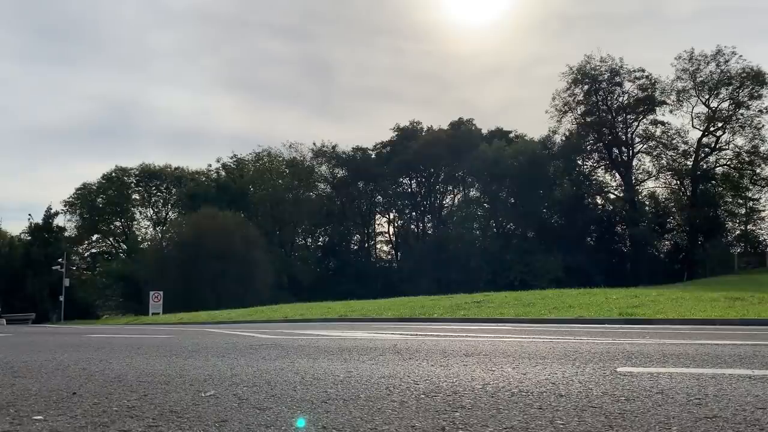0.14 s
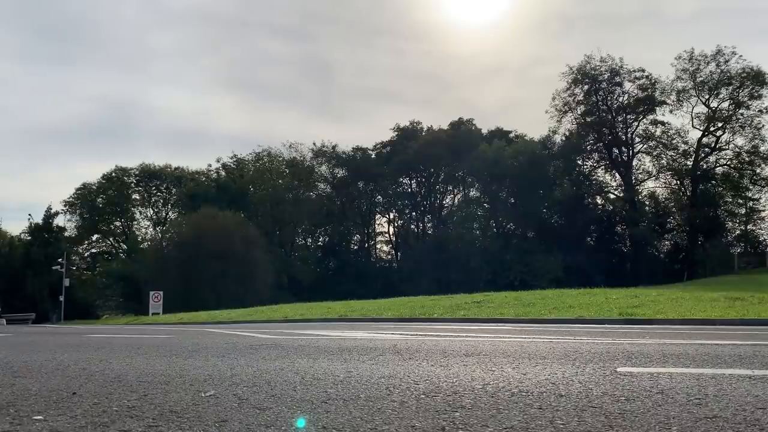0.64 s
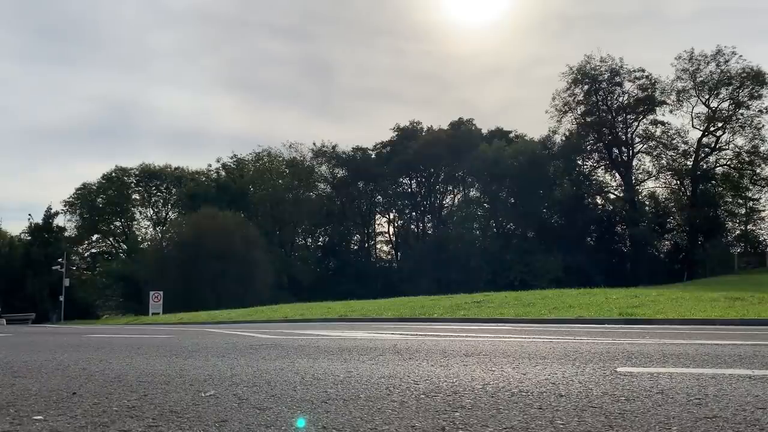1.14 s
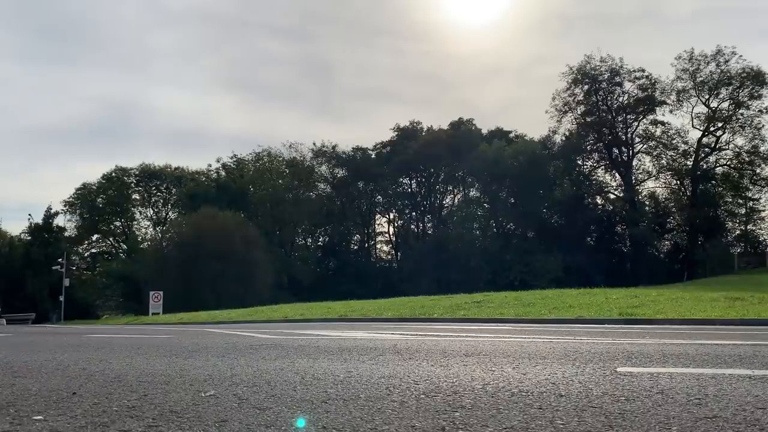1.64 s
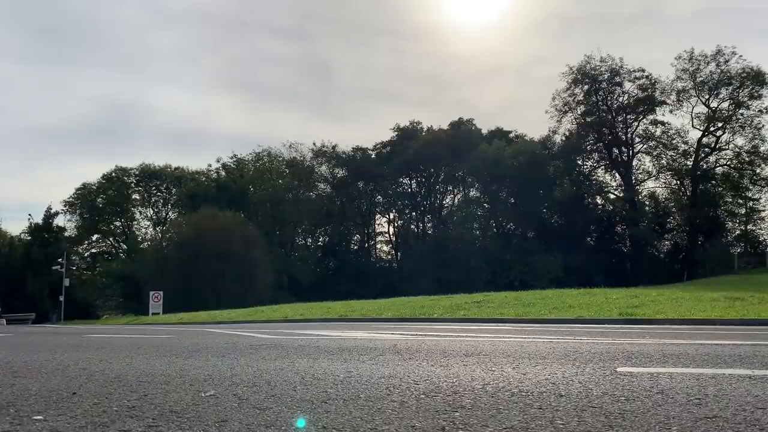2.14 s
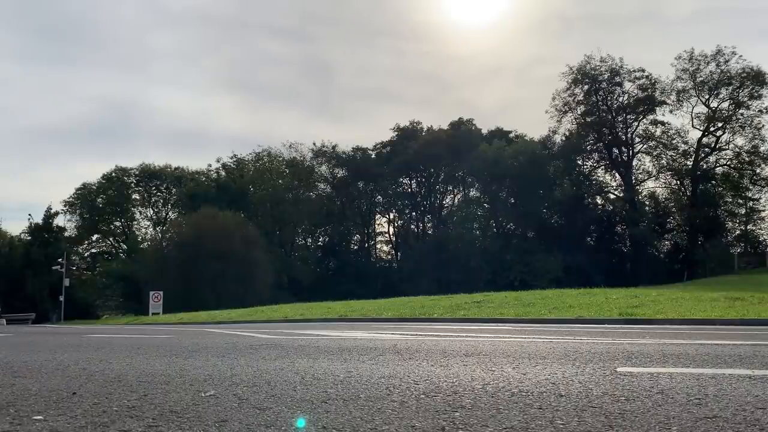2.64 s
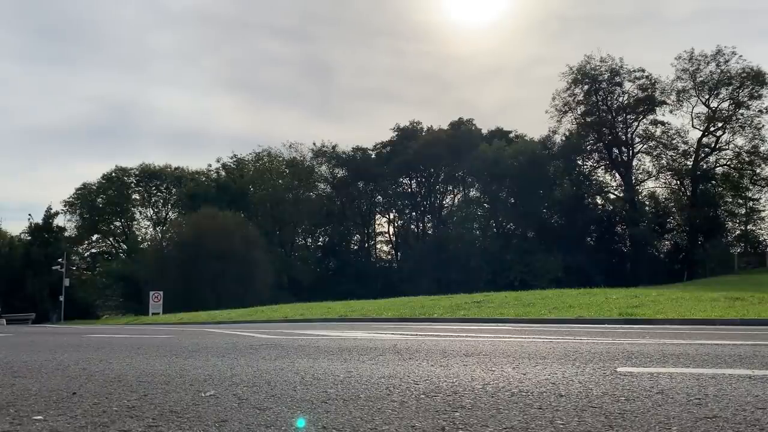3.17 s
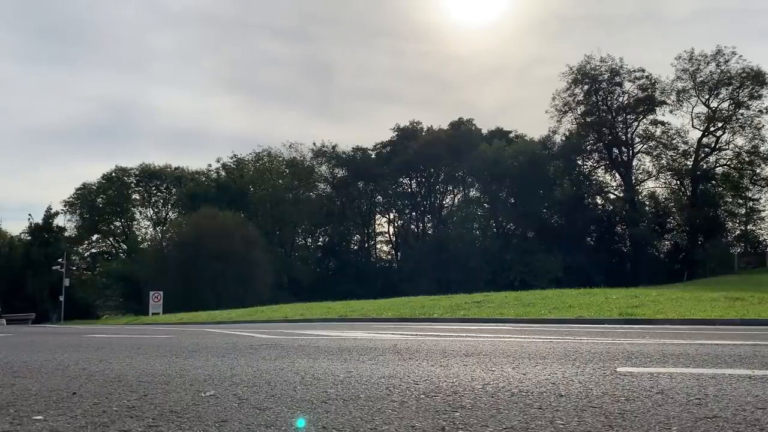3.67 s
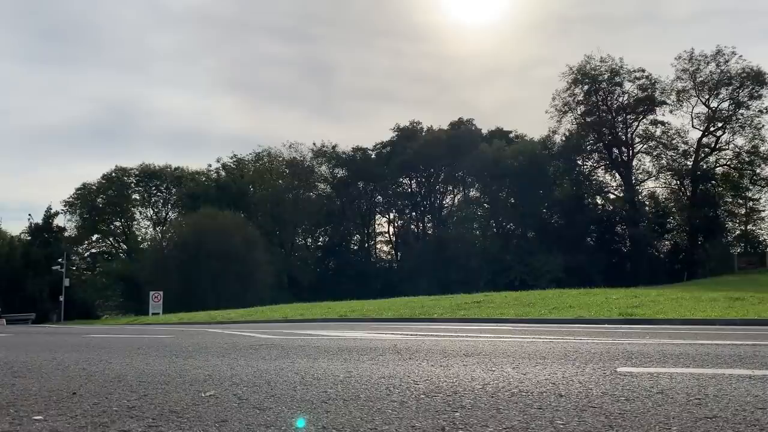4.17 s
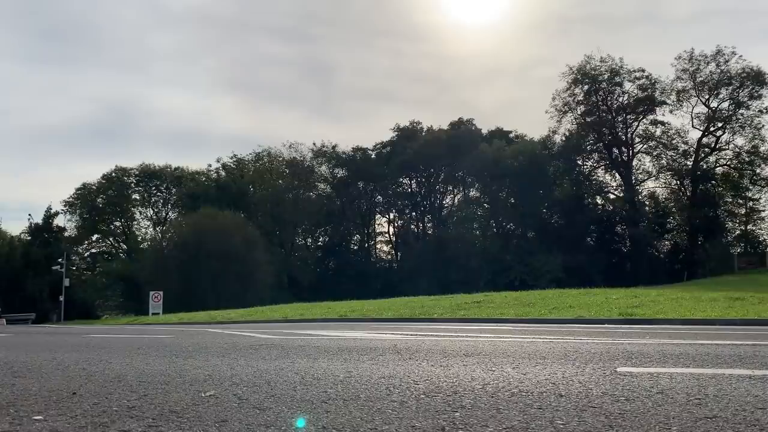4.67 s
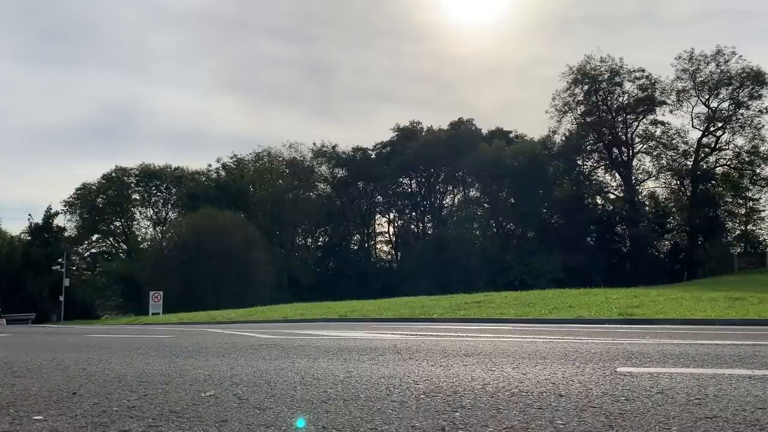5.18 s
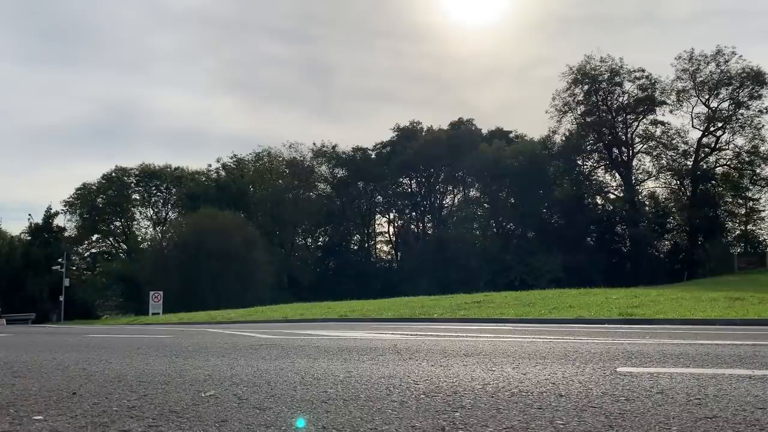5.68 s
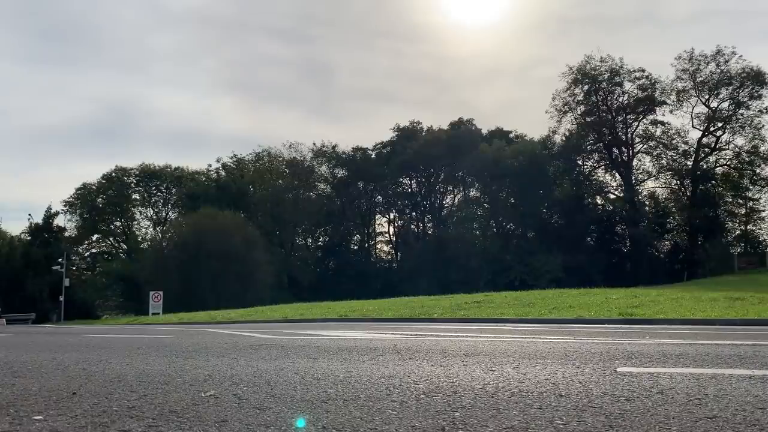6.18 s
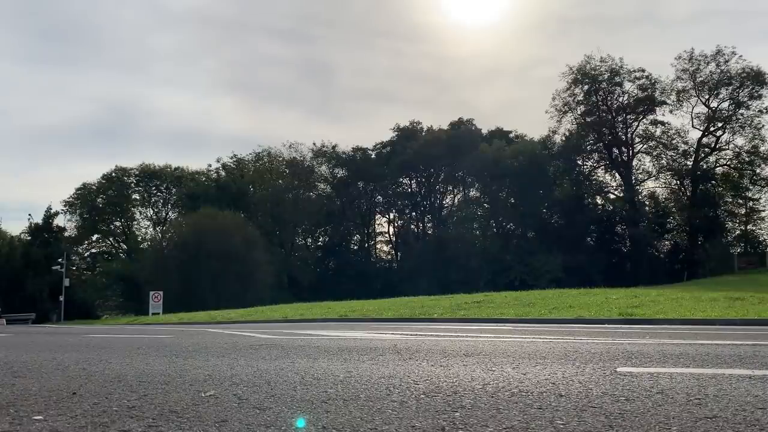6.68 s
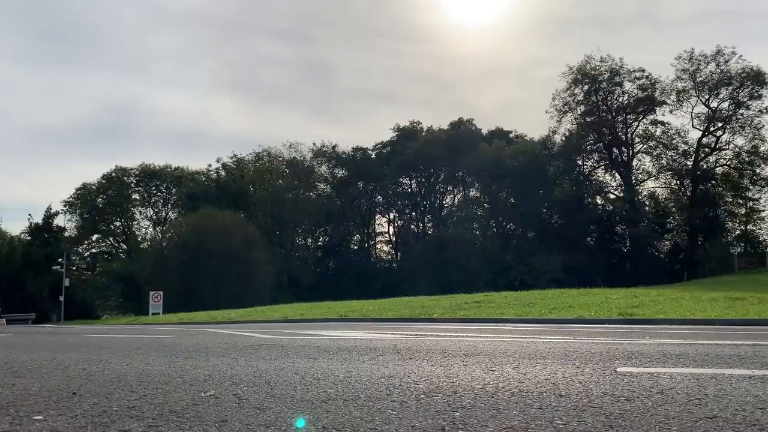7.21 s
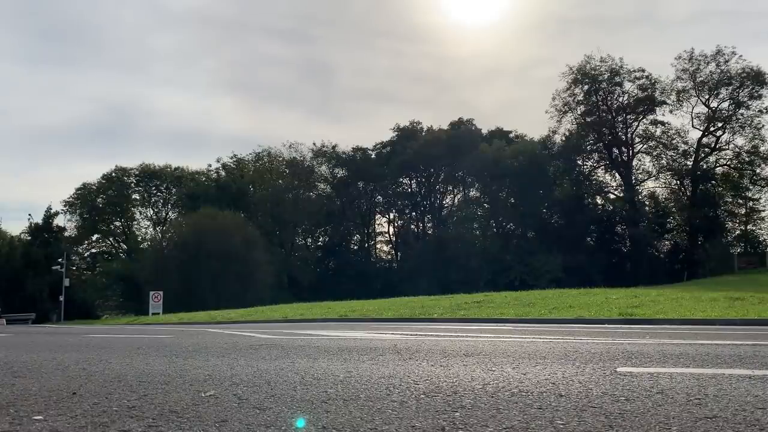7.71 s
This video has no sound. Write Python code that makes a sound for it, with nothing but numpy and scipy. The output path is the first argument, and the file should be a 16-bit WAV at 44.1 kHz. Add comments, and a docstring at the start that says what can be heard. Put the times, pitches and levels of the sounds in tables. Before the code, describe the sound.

Close, dry stereo sound on open tarmac. From 0 s a four-cylinder motorcycle idles: a low, lumpy exhaust burble, about 12 engine cycles and 49 firings per second, three cylinders firm and one weak and irregular. Soft gas rustle, ticking valve gear, a faint steady fuel-pump whine near 2.6 kHz and a light metallic buzz surround it; faint far tyre roar dies away early. A tiny high bird chirp comes at 1.1 s. The speed dips slightly around 1.8 s, then creeps up from 2.4 s, with a small bark at 2.8 s. At 3.3-3.4 s quick ratchet clicks sound, with switch clicks at 3.5 and 3.6 s, as the throttle opens and the engine climbs with a singing hum. From about 4.2 s it holds a faster idle, about 66 firings per second, with droning pipe, stronger buzz and dropped beats; dull exhaust pops cluster at 4.8-5.6 s, one faint at 7.2 s. The buzz drops near 7.4 s; the engine is still running at the end, near 7.8 s.

```python
"""On the tarmac, close to a phone: a four-cylinder motorcycle idles, then is held at a faster idle.
Three cylinders fire firmly and one weakly and unevenly; each blow rings the exhaust chambers and late burns
bark in the pipe. Engine orders sing in pipe resonances, gas and valve gear rustle as shaped noise, a loose
part buzzes, a fuel pump whines as a tone, a control on the bars clicks, a bird chirps once and far traffic
fades. Two microphone ports hear it at different levels and phases."""
import sys
import numpy as np
from scipy import signal
from scipy.fft import rfft, irfft
from scipy.io import wavfile
from scipy.ndimage import uniform_filter1d, minimum_filter1d

SR = 44100
rng = np.random.default_rng(int(sys.argv[2]) if len(sys.argv) > 2 else 0)


def volts(x):
    """Linear amplitude factor 10**(x/20) for a level x in dB, scalar or array-like."""
    e = np.asarray(x, float) / 20
    return 10 ** e


def store_wav(level_fs):
    """Save 16-bit WAV to argv[1]."""
    pcm = np.round(np.clip(np.atleast_2d(level_fs), -1, 1) * 32767)
    wavfile.write(sys.argv[1], SR, pcm.T.astype(np.int16))


N = 345303
T = np.arange(N) / SR  # time, s
HZ = np.arange(N // 2 + 1) * SR / N  # frequency of each spectrum bin

# right port against left: pitch_hz, gain_db, lead_rad, likeness (0-1)
PORT_RESPONSE = [(0, 1, .1, 1), (65, .3, .45, 1), (130, -2.8, .95, 1), (216, -5.2, 1.37, 1),
                 (300, -5.8, 1.75, 1), (386, -3.5, 2.4, 1), (495, -1.5, 2.72, .97), (553, 0.2, 3.478, 0.92),
                 (775, 0.97, 2.99, 0.98), (1196, 1, 3.18, 0.61), (1750, 1, 4.86, 0.87),
                 (2520, 2.5, 7.05, 0.9), (3950, 0, 10.43, 0.97), (5300, -1, 12.5, 0.8), (6110, 3, 14.63, 1),
                 (7350, -4.5, 20, 0.5), (8170, 15, 19.5, 0.97), (10230, 4, 19.5, 0), (10600, 5, 22, .9),
                 (11700, -2, 22.42, 1), (13050, -3, 23.7, .95), (16000, -10.5, 31.5, .9)]

# far tyre roar: noise band, level at the start and fade
ROAD_HZ, ROAD_WIDTH_HZ, ROAD_START_DB, ROAD_FADE_DB_PER_S = 980, 220, -45, -6
# chirp contour: start_s, pitch_hz, level_db
BIRD_CONTOUR = [(1.072, 8700, -64), (1.084, 9060, -54), (1.11, 8900, -56), (1.125, 8520, -57)]
# ratchet clicks, then two switch clicks: start_s, peak_db (before CLICK_TRIM_DB), ring_hz
CLICK_EVENTS = [(3.3169, -20, 9200), (3.3336, -20, 8860), (3.3473, -15, 9000), (3.3606, -20, 9200),
                (3.3742, -20, 8100), (3.39, -18.5, 8200), (3.5245, -23, 8520), (3.6405, -18.5, 8000)]
CLICK_TRIM_DB = -2
# the ratchet has more body than the switch
RATCHET_ENDS_S, RATCHET_LOW_HZ, SWITCH_LOW_HZ = 3.45, 2200, 5200
PUMP_HZ, PUMP_LEFT_DB = 2559, -49.5  # centre pitch, centre rms level at the left port
# buzz of a loose part: start_s, level_db (before flutter), centre_hz
BUZZ_CONTOUR = [(0, -57, 1803), (2.9, -53, 1820), (4.2, -50, 1830), (5.7, -53, 1760), (6.45, -53.5, 1738),
                (6.8, -50.5, 1860), (7.33, -49, 1785), (7.47, -61, 1827), (7.83, -64, 1960)]
# rustle of gas and valve gear: pitch_hz, density_db_per_hz (before flicker and pulsing)
RUSTLE_SPECTRUM = [(250, -58), (420, -54.5), (540, -56), (640, -63), (760, -66.5), (900, -66),
                   (1280, -77.5), (2150, -84.5), (3000, -89), (3600, -96.5), (4400, -87.5), (5200, -94),
                   (8600, -104.5), (12500, -99), (15000, -106)]

# engine speed: start_s, rate_cycles_per_s
ENGINE_SPEED = [(0.0, 12.255), (0.64, 12.269), (0.86, 11.786), (1.09, 12.153), (1.73, 12.123),
                (1.83, 11.647), (2.43, 12.645), (2.55, 13.096), (3.34, 13.566), (3.62, 15.246),
                (4.06, 15.612), (4.16, 15.969), (4.76, 16.768), (5.64, 16.129), (6.25, 16.359),
                (6.39, 16.776), (6.46, 16.415), (7.83, 16.92)]
START_CYCLE = -.050  # crank position at the start, cycles
IDLE_RATE, FAST_RATE = 12, 16.5  # cycles per second
# the crank runs a little ahead or behind at random: spread in cycles, changes per second
WANDER_CYCLES, WANDER_PER_S = .004, 14
# throttle opening: start_s, opening_share
THROTTLE_MOVES = [(3.28, 0), (3.4, .8), (3.58, 1), (3.7, .5), (4.0, .35), (4.15, 0)]

# long-ringing pipe resonances: pitch_hz, half_width_hz, idle_db, fast_idle_db (before flutter)
PIPE_RESONANCES = [(347, 9, -46, -39), (380, 9, -46, -31), (468, 8, -29, -36), (497, 14, -44, -28),
                   (548, 14, -52, -39)]
DRONE_FULL_SHARE = .6  # share of the way to fast idle at which the resonances reach full strength
FULL_THROTTLE_GAIN = 5  # speed gain that counts as full throttle, cycles per second per second
OPEN_ORDER, OPEN_ORDER_DB = 25, -27  # engine order that sings on open throttle, level at full opening

# firing place of each cylinder: idle_cycles, fast_idle_cycles (shares of the cycle)
FIRING_PLACES = [(-.1621, -.261), (.0939, -.0181), (.334, .2225), (.5886, .4732)]
# one row a cylinder: header_tuning_ratio, idle_scatter_db, fast_scatter_db (before PART_SPREAD), slip_cycles
CYLINDER_TRAITS = [(1.079, 1.6, 1.8, .013), (1.037, .9, .8, .001), (.95, .9, .9, .001),
                   (1.071, 1.1, 1.8, .0015)]
# engine speeds at which each cylinder's voice is given: rate_cycles_per_s
VOICE_RATES = [12.1, 13.3, 15.5, 16.5]
# one block a cylinder, one row a speed:
# deep_boom_db, boom_db, low_bark_db, high_bark_db, rasp_db, upper_rasp_db (before scatter)
CYLINDER_VOICES = [
    [(9.2, 1.3, 3, 4.6, -5.5, 1.5), (1.4, 2.4, -8, 1.6, -6, 3.5), (1.5, 4.6, -4.5, 1.2, 2, 12),
     (2.3, 5.2, -0.5, 3.9, 5, 2.5)],
    [(2, 10, 8.5, 5.9, 8.4, -9), (3.2, 16.9, 13.1, 3.6, 7.4, -6), (7.4, 11.2, 13.3, 5.3, 11, -3.4),
     (7.8, 5.7, 12.8, 5.1, 9.3, -3)],
    [(6.8, 12, 11.3, 1.6, -3, -1.5), (5.3, 13.6, 7.6, 8.4, 1.5, 5.8), (2.2, 10, 1.7, 11, 17.5, 15.5),
     (1.8, 2.7, 6.5, 11.4, 15, 3.5)],
    [(9.4, -18, 9, 8.5, 5, 7.5), (9.3, 0, 1, 11, -2.5, 15.5), (9.3, -11.5, 5, 2.5, 4, -9.5),
     (9.6, -18, 5.5, 5, -6.3, -10)],
]
# share of the scatter that each part of the voice takes: factor
PART_SPREAD = [1.2, 1.9, 1.6, 1.4, 0.3, 0.5]
# altered firings, mostly weak: heard_s, change_db
UNEVEN_FIRINGS = [(0.727, -14), (0.984, -7.5), (1.154, -3.5), (1.57, -3.5), (1.649, 1.5), (3.961, 2.5),
                  (4.879, -16.5), (5.122, -6), (6.041, -14), (6.637, -1), (6.951, -25), (7.298, -9.5),
                  (7.735, -10.5)]
# exhaust chambers: pitch_hz (before header tuning), t60_s, level_db (before the voice)
CHAMBERS = [(71.6, .099, -16.5), (124.7, .142, -26.5), (139.6, .121, -26.8), (190.9, .064, -15.5),
            (250.4, .093, -16.1), (235.4, .069, -14.9), (376.4, .129, -28.9), (387.2, .106, -25.3),
            (478, .067, -30), (620, .04, -39)]
# part of the voice that each chamber gives: voice_column
CHAMBER_PART = [0, 1, 1, 2, 3, 3, 4, 4, 5, 5]
# time for a blow to reach each chamber: delay_ms
CHAMBER_DELAY_MS = [9.91, .52, 11.43, 4.37, 8.55, 5.39, 8.62, 7.73, 5.66, 7.17]
# chamber that rings only on open throttle: pitch_hz, t60_s, level_db
OPEN_CHAMBER = (296, .13, -18)
# late burns that bark in the pipe: start_s, strike_db (before softening and ringing)
LATE_BURNS = [(2.772, -27), (3.347, -27), (3.836, -25.5), (4.763, -20.5), (4.887, -25.5), (5.003, -21.5),
              (5.185, -25), (5.462, -35.5), (5.491, -25.5), (5.614, -28), (7.231, -38)]
# pipe modes struck by the late burns: pitch_hz, t60_s, level_db
BURN_MODES = [(292.5, 0.11, 18), (527, 0.044, 19.5), (900, .07, -11)]
BURN_SOFT_HZ = 835
# faint late burns at random moments: rate at fast idle (none at idle), strike level, scatter either way
FAINT_BURNS_PER_S, FAINT_BURN_DB, FAINT_BURN_SCATTER_DB = 2, -40.5, -5


def curve(table, at):
    """Every column of a table, read at the given places of its first column."""
    x, *columns = np.transpose(table)
    return [np.interp(at, x, c) for c in columns]


def blows(times, sizes):
    """Impulses between samples, each shared by its two neighbours."""
    keep = (times > 0) & (times * SR < N - 2)
    place, sizes, out = times[keep] * SR, sizes[keep], np.zeros(N)
    np.add.at(out, place.astype(int), sizes * (1 - place % 1))
    np.add.at(out, place.astype(int) + 1, sizes * (place % 1))
    return out


def ring(strikes, hz, t60, db):
    """One resonance: each strike starts a sine that decays by 60 dB in t60 seconds."""
    t = T[:int(1.2 * t60 * SR)]
    decay = np.sin(2 * np.pi * hz * t) * 1000. ** (-t / t60)
    return volts(db) * signal.oaconvolve(strikes, decay)[:N]


def band(hz, width):
    """Noise of rms 1 in a bell-shaped band."""
    bell = np.exp(-.5 * ((HZ - hz) / width) ** 2)
    x = irfft(rfft(rng.standard_normal(N)) * bell, N)
    return x / x.std()


def walk(rate):
    """Random levels held 1 / rate s and smoothed twice; spread near 1."""
    k = int(SR / rate)
    held = np.repeat(rng.standard_normal(N // k + 1), k)
    return 1.33 * uniform_filter1d(uniform_filter1d(held, k), k)[:N]


def ports(x, other=0):
    """The left port hears x; the right hears it shifted and coloured, partly replaced by an unrelated sound."""
    db, lead, like = curve(PORT_RESPONSE, HZ)
    like = np.clip(like, 0, 1)
    shifted = like * np.exp(1j * lead) * rfft(x)
    unrelated = np.sqrt(1 - like ** 2) * rfft(other + 0 * x)
    return np.array([x, irfft(volts(db) * (shifted + unrelated), N)])


def road():
    """Distant tyre roar: a band of noise, largely shared by the two ports, that dies away."""
    level = volts(ROAD_START_DB + ROAD_FADE_DB_PER_S * T)
    return ports(*(level * band(ROAD_HZ, ROAD_WIDTH_HZ) for _ in range(2)))


def bird():
    """One short arched whistle: a gliding sine."""
    hz, db = curve(BIRD_CONTOUR, T)
    on = uniform_filter1d(1. * (T > BIRD_CONTOUR[0][0]) * (T < BIRD_CONTOUR[-1][0]), 200)
    return ports(on * volts(db) * np.sin(2 * np.pi * np.cumsum(hz) / SR))


def clicks():
    """Ratchet and switch: millisecond noise ticks with a bright ring and a short rattling tail."""
    out = np.zeros(N)
    t = T[:int(.03 * SR)]
    shape = np.minimum(t / .0004, 1) * (np.exp(-t / .0005) + .11 * np.exp(-t / .005))
    for s, db, hz in CLICK_EVENTS:
        at = int(s * SR)
        tick = shape * (.35 * np.sin(2 * np.pi * hz * t) + rng.standard_normal(len(t)))
        low = RATCHET_LOW_HZ if s < RATCHET_ENDS_S else SWITCH_LOW_HZ
        tick = signal.sosfilt(signal.butter(2, [low, 16000], "band", fs=SR, output="sos"), tick)
        out[at:at + len(t)] += volts(db) * tick / np.abs(tick).max()
    return ports(volts(CLICK_TRIM_DB) * out)


def whine():
    """The fuel pump: a sustained tone that trembles slightly in level and pitch."""
    tone = np.sqrt(2) * volts(PUMP_LEFT_DB + 0.2 * walk(11))
    phase = 2 * np.pi * np.cumsum(PUMP_HZ + 2.0 * walk(9)) / SR
    port_lead = np.array([[0], [2.1]])  # rad
    port_gain = volts(np.array([[0], [-5.5]]))
    return tone * np.sin(phase + port_lead) * port_gain


def buzz(cycle):
    """A loose part shaken by the firings: a noisy ring that flutters with them and comes in uneven bursts."""
    db, hz = curve(BUZZ_CONTOUR, T)
    shake = volts(db + 1.4 * walk(70)) * (1 + 0.2 * np.cos(8 * np.pi * cycle))
    carrier = np.sqrt(2) * np.sin(2 * np.pi * np.cumsum(hz) / SR)
    return ports(shake * band(30, 74) * carrier)


def rustle(cycle, fast_share):
    """Coloured noise, louder with speed: gas puffs at each firing; the valves tick, one harder at fast idle."""
    hz, db = np.transpose(RUSTLE_SPECTRUM)
    colour = volts(np.interp(np.log(HZ + 1), np.log(hz), db, left=-120))
    puff = 1 + 0.24 * np.cos(2 * np.pi * (4 * cycle - .2))
    hard_tick = 0.83 * fast_share * np.exp(-((cycle - .75) % 1) / 0.046)
    tick = 1 + hard_tick + .5 * np.exp(-((4 * cycle) % 1) / 0.063)
    flicker_low = volts(1.5 * walk(40) + 1.2 * fast_share)
    flicker_high = volts(1.0 * walk(60) + 1.7 * fast_share)
    low = HZ < 3400  # gas below, valve gear above
    out = []
    for _ in range(2):
        gas = rfft(rng.standard_normal(N) * puff * flicker_low) * low
        gear = rfft(rng.standard_normal(N) * tick * flicker_high) * ~low
        out.append(irfft((gas + gear) * colour * np.sqrt(SR / 2), N))
    return ports(*out)


def drone(cycle, rate, fast_share):
    """Engine orders sing as they pass through long-ringing pipe resonances; one sings on open throttle."""
    throttle = uniform_filter1d(np.gradient(rate) * SR, SR // 10) / FULL_THROTTLE_GAIN
    strength = np.clip(np.maximum(fast_share / DRONE_FULL_SHARE, throttle), 0, 1) ** 2
    out = 0
    for order in range(20, 43):
        gain = 0
        for hz, width, idle_db, fast_db in PIPE_RESONANCES:
            peak = volts(idle_db + strength * (fast_db - idle_db))
            gain = gain + peak / (1 + ((order * rate - hz) / width) ** 2)
        tone = np.sin(2 * np.pi * (order * cycle + rng.random()))
        out = out + gain * volts(1.8 * walk(8)) * tone
    opening = curve(THROTTLE_MOVES, T)[0]
    opened = volts(OPEN_ORDER_DB) * opening * np.sin(2 * np.pi * OPEN_ORDER * cycle)
    return ports(out + opened)


def late_burns(fast_share):
    """Softened strikes, set and random, ring the pipe modes; the faint ones come more often at fast idle."""
    s, db = np.transpose(LATE_BURNS)
    when, keep, size = rng.random((int(FAINT_BURNS_PER_S * T[-1]), 3)).T
    heard = keep < np.interp(when * T[-1], T, fast_share)
    s = np.append(s, when[heard] * T[-1])
    db = np.append(db, FAINT_BURN_DB + FAINT_BURN_SCATTER_DB * (2 * size[heard] - 1))
    soften = signal.butter(4, BURN_SOFT_HZ, fs=SR, output="sos")
    strikes = signal.sosfilt(soften, blows(s - .0008, volts(db)))
    return sum(ring(strikes, *mode) for mode in BURN_MODES)


def exhaust(cycle, rate, fast_share):
    """Each cylinder's blows, uneven in size and time, ring the chambers through its own header."""
    out = 0
    turn = np.arange(int(cycle[-1]) + 2)
    share = np.interp(turn, cycle, fast_share)
    speed = np.interp(turn, cycle, uniform_filter1d(rate, SR // 4))
    miss_s, miss_db = np.transpose(UNEVEN_FIRINGS)
    for traits, places, voice in zip(CYLINDER_TRAITS, FIRING_PLACES, CYLINDER_VOICES):
        tune, idle_db, fast_db, slack = traits
        place = places[0] + share * (places[1] - places[0])
        part_db = curve(np.column_stack([VOICE_RATES, voice]), speed)
        slip, common, *own = rng.standard_normal((len(turn), 8)).clip(-2, 1.2).T
        times = np.interp(turn + place + slack * slip, cycle, T, left=-1, right=-1)
        spread = idle_db + share * (fast_db - idle_db)
        opening = curve(THROTTLE_MOVES, times)[0]
        out = out + ring(blows(times, opening), *OPEN_CHAMBER)
        # an altered firing changes the blow heard about 13 ms later
        miss = np.exp(-((times[:, None] + 0.013 - miss_s) / 0.0098) ** 4) @ miss_db
        for (hz, t60, db), ms, part in zip(CHAMBERS, CHAMBER_DELAY_MS, CHAMBER_PART):
            scatter = PART_SPREAD[part] * spread * (.7 * common + .7 * own[part])
            size = volts(part_db[part] + miss + scatter)
            out = out + ring(blows(times + ms / 1000, size), hz * tune, t60, db)
    out = out + late_burns(fast_share)
    # a blow of gas is not sharp: it carries little above a kilohertz
    return signal.sosfilt(signal.butter(2, 1000, fs=SR, output="sos"), out)


def scene():
    """All sources as the two ports hear them."""
    rate = curve(ENGINE_SPEED, T)[0]
    even = START_CYCLE + np.cumsum(rate) / SR
    cycle = even + WANDER_CYCLES * walk(WANDER_PER_S)
    smooth_rate = uniform_filter1d(rate, SR // 4)
    fast_share = np.clip((smooth_rate - IDLE_RATE) / (FAST_RATE - IDLE_RATE), 0, 1)
    background = road() + bird() + clicks()
    machine = whine() + buzz(cycle) + rustle(cycle, fast_share) + drone(even, rate, fast_share)
    return background + machine + ports(exhaust(cycle, rate, fast_share))


def low_pass(x):
    """Removes everything above the highest recorded frequency."""
    return signal.sosfilt(signal.butter(12, 15060, fs=SR, output="sos"), x)


def record(dry):
    """The phone cuts the deepest bass and turns the gain down around the highest peaks."""
    x = signal.sosfilt(signal.butter(2, 45, "high", fs=SR, output="sos"), dry)
    peak = np.abs(x).max(axis=0) + 1e-9
    gain = minimum_filter1d(np.minimum(1, .97 / peak), size=400)
    mix = x * uniform_filter1d(uniform_filter1d(gain, size=200), size=200)
    return low_pass(mix)


dry = scene()
out = record(dry)
store_wav(out)
```